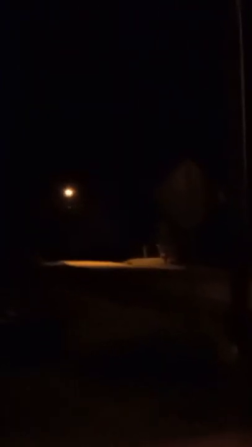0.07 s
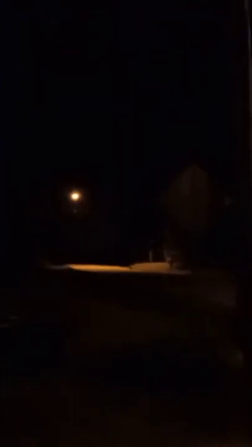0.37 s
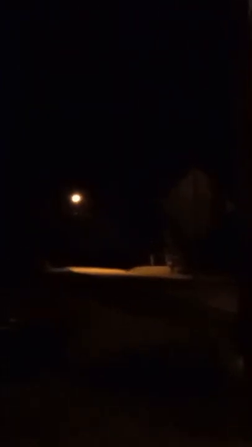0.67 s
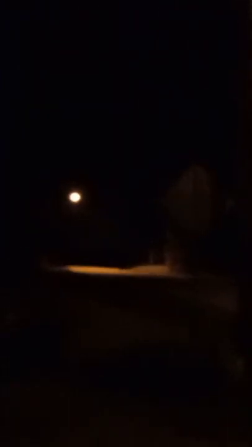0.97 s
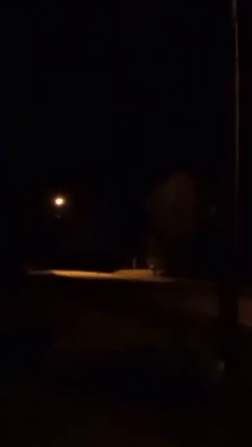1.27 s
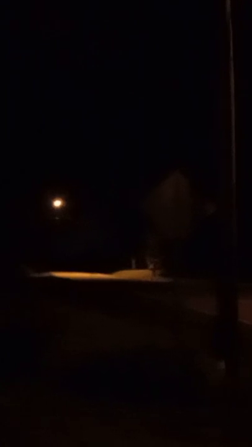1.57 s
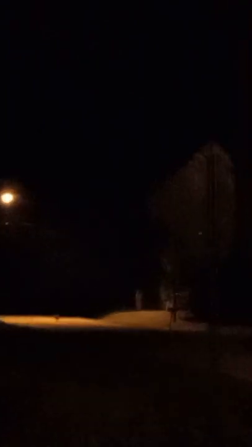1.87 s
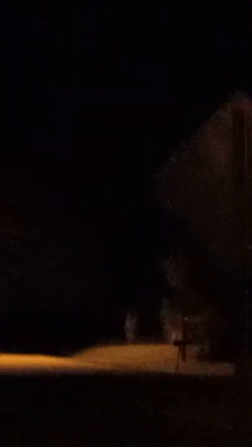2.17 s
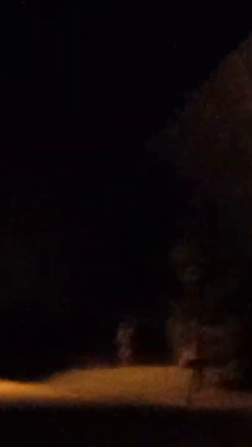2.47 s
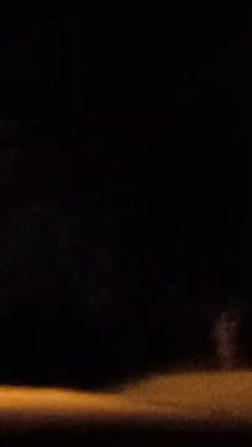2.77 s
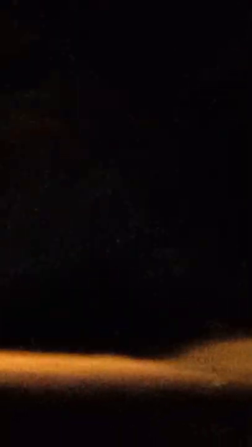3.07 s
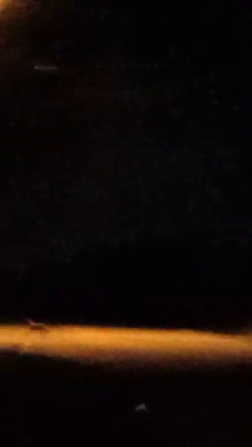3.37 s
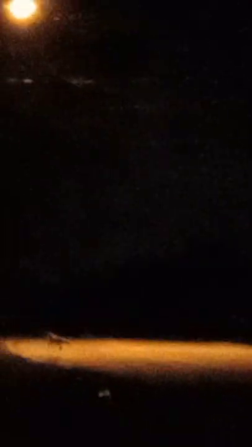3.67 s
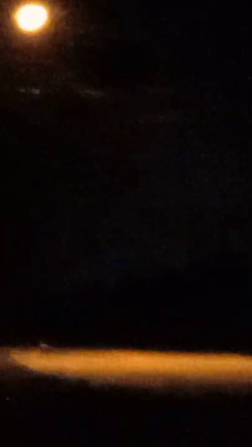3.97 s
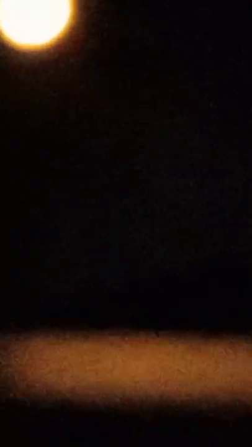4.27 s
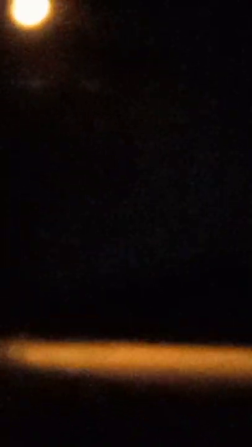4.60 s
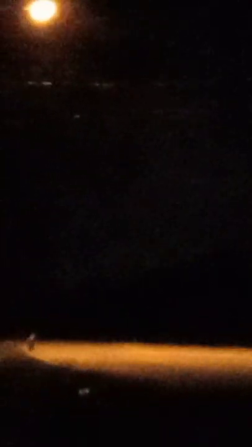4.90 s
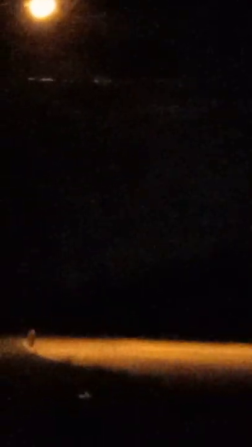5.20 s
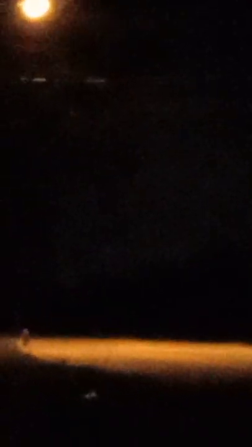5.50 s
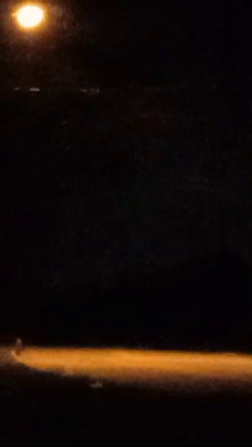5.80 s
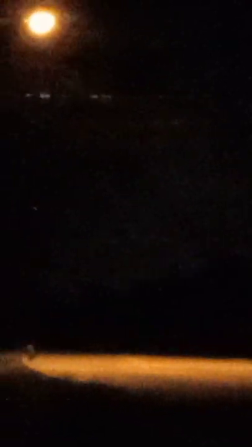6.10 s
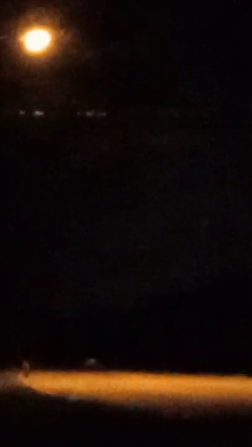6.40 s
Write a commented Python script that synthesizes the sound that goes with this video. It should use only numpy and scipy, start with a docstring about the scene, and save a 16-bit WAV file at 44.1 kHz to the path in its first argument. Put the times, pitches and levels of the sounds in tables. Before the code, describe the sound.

A sharp, hollow knock and a duller thud on the microphone come first, the loudest sounds on a still street at night. A fox then screams twice from a distance: a raspy yelp that clears into a high tone, and after a pause a quieter, purer wail with more echo. Faint crickets, pulsing katydids, barely audible far animal calls and a low town rumble continue behind.

```python
"""A quiet night street. Throughout, the town rumbles far away, crickets trill in chorus and two katydids
chirp at their own pace; faint animal calls come and go. Fingers bump and brush the hand-held camera,
mostly at its right microphone port, hardest at 1.0 and 1.5 s. At 2.1 s a fox screams: a harsh yelp
that clears into a tone and ends in a hoarse catch. At 4.1 s it gives a cleaner wail.
Houses and trees echo each scream."""
import sys
import numpy as np
from scipy import signal
from scipy.fft import rfft, irfft, next_fast_len
from scipy.io import wavfile
from scipy.ndimage import map_coordinates

SR = 44100
rng = np.random.default_rng(int(sys.argv[2]) if len(sys.argv) > 2 else 0)


def wrap_up_sound(samples):
    """Save the sound to the file named by the first command line argument, as 16-bit audio."""
    columns = np.atleast_2d(samples).T
    # keep every value between -1 and 1, then stretch to whole-number steps
    tamed = np.clip(columns, -1, 1)
    steps = np.round(tamed * 32767).astype(np.int16)
    wavfile.write(sys.argv[1], SR, steps)


N = 293265


def amp(db):
    return 10 ** (np.asarray(db) / 20)


def unit(x):
    return x / np.sqrt(np.mean(x ** 2) + 1e-20)


def clock():
    return np.arange(N) / SR


def ramp(x):
    return np.clip(x, 0, 1)


def along(points, hz):
    """Interpolate (Hz, value) points on a log axis."""
    knots_hz, values = np.transpose(points)
    return np.interp(np.log(hz + 1), np.log(knots_hz + 1), values)


def curves(rows):
    """One value per sample for each column after the time."""
    times_s, *columns = np.transpose(rows)
    return [np.interp(clock(), times_s, column) for column in columns]


def gate(start_s, end_s, fade_s):
    """Open between two times, with linear ramps."""
    return ramp(np.minimum(clock() - start_s, end_s - clock()) / fade_s + .5)


def hump(centre_s, half_s):
    """Gaussian of height 1."""
    return np.exp(-((clock() - centre_s) / half_s) ** 2)


def wobble(rate_hz):
    """Smooth random curve, rate_hz knots a second."""
    return map_coordinates(rng.standard_normal(int(N * rate_hz / SR) + 4), [clock() * rate_hz])


def cycle(hz):
    """Running phase of a moving frequency."""
    return 2 * np.pi * np.cumsum(hz) / SR


def blur(phase, width_hz):
    """Narrow noise band, rms 1, riding on a pitch."""
    return unit(wobble(width_hz) * np.sin(phase) + wobble(width_hz) * np.cos(phase))


def filtered(x, response):
    """Apply a gain given as a function of Hz."""
    size = next_fast_len(N + SR // 2)
    return irfft(rfft(x, size) * response(np.fft.rfftfreq(size, 1 / SR)), size)[..., :N]


def noise(spectrum):
    """Coloured noise, rms 1, falling away outside its spectrum."""
    low_hz, high_hz = spectrum[0][0], spectrum[-1][0]
    skirts = lambda hz: np.minimum(hz / low_hz, 1) ** 4 * (high_hz / np.maximum(hz, high_hz)) ** 8
    return unit(filtered(rng.standard_normal(N), lambda hz: amp(along(spectrum, hz)) * skirts(hz)))


def wide(spectrum, shared):
    """Stereo noise, partly shared by the two ports."""
    common = np.sqrt(shared) * noise(spectrum)
    return common + np.sqrt(1 - shared) * np.array([noise(spectrum), noise(spectrum)])


def pan(left_db):
    """Port gains with mean 1."""
    gains = amp([[left_db / 2], [-left_db / 2]])
    return gains / gains.mean()


# Decay of the far echo. Each row: frequency in Hz, T60 in seconds.
ECHO_DECAY = [(200, 6.6), (1050, 1.81), (2200, 0.88), (4500, 1.33), (10000, 1.08)]

def street(x, near_db, far_db, near_t60_s):
    """Near walls scatter quickly; far houses and trees answer late and long."""
    hz, t, spectra = signal.stft(rng.standard_normal((2, 2 * SR)), SR, nperseg=256)
    decay = amp(-60 * t / along(ECHO_DECAY, hz)[:, None])
    build_up = 1 - np.exp(-t / 0.09)
    far = signal.istft(spectra * decay * build_up, SR, nperseg=256)[1]
    t = np.arange(far.shape[1]) / SR
    near = rng.standard_normal(far.shape) * amp(-60 * t / near_t60_s) * (t > .006)
    echo = amp(near_db) * near / np.linalg.norm(near[0]) + amp(far_db) * far / np.linalg.norm(far[0])
    return x + signal.fftconvolve(np.atleast_2d(x), echo, axes=1)[:, :N]


def port_shadow(x):
    """The left port is turned away and hears less treble."""
    shade = [(700, -3.5), (1200, -3.0), (2300, -14), (4400, -16)]  # Hz, left minus right in dB
    left = lambda hz: amp(along(shade, hz))
    return filtered(x, lambda hz: 2 * np.array([left(hz), np.ones(len(hz))]) / (1 + left(hz)))


# Background drift. Each row: time in seconds, relative rumble level in dB, relative hiss level in dB.
BACKGROUND_DRIFT = [(0.0, -58, -77), (0.31, -61.5, -80.5), (0.94, -59, -77.5), (1.35, -55, -77.5),
                    (1.94, -60, -78.5), (2.39, -52, -72), (2.83, -61.5, -78), (3.87, -58.5, -78.5),
                    (4.18, -52, -75.5), (4.74, -58.5, -76), (5.15, -56, -78.5), (5.74, -58.5, -78),
                    (6.11, -57.5, -80), (6.65, -55.5, -75)]
# Town rumble. Each row: frequency in Hz, relative level in dB.
TOWN_SPECTRUM = [(13, -76), (22, -66), (41, -14.5), (76, 1), (118, -3), (145, -10.5), (259, -20),
                 (360, -19.5), (381, -25.5), (480, -26.5), (641, -31.5), (734, -29.5), (1080, -30.5),
                 (1440, -41), (2200, -62), (2860, -85), (4840, -120)]
# Soft low thumps close by. Each row: centre in seconds, bass gain in dB.
LOW_THUMPS = [(.38, 11), (.65, 5.5), (2.05, 6.5), (3.059, 9.5), (3.53, 6.5), (4.92, 7)]
# Distant machinery. Each row: frequency in Hz, relative level in dB.
MACHINE_TONES = [(312.2, -79), (355.3, -77.5), (1303, -84), (1895, -97.5)]
# Treble hiss. Each row: frequency in Hz, relative level in dB.
TREBLE_SPECTRUM = [(1500, -24), (3400, -19.5), (4200, -1.5), (4900, 7.5), (5600, 2), (6050, 7), (6600, -14),
                   (7500, 3.5), (8400, -9.5), (9300, -33), (10500, -4.5), (12000, 3), (13500, 5),
                   (15700, 0)]

def night_town():
    """Far town rumble, with a few soft low thumps close by, faint machine hum and fine hiss."""
    rumble_db, hiss_db = curves(BACKGROUND_DRIFT)
    bass_db = rumble_db + 1.5 * wobble(9) + sum(db * hump(s, half_s=0.03) for s, db in LOW_THUMPS)
    bass_share = lambda hz: 1 / (1 + (hz / 170) ** 6)
    bass = amp(bass_db + 4) * filtered(wide(TOWN_SPECTRUM, 0.89), lambda hz: np.sqrt(bass_share(hz)))
    wash = amp(-54.5) * filtered(wide(TOWN_SPECTRUM, 0.33), lambda hz: np.sqrt(1 - bass_share(hz)))
    hum = sum(amp(db + 4) * np.sin(cycle(hz * (1 + 0.00384 * wobble(15)))) for hz, db in MACHINE_TONES)
    left_lead_s = 0.0005
    arrival = lambda hz: np.exp(np.array([[1j], [-1j]]) * np.pi * hz * left_lead_s)
    lows = filtered(bass + wash + hum, arrival) * pan(-6.5)
    hiss = amp(hiss_db + 4) * wide(TREBLE_SPECTRUM, 0.057) * pan(-11.5)
    floor_spectrum = [(1200, 5.5), (3300, -5.0), (6000, 2), (9300, -6.5), (12000, -3.0), (15700, -9)]
    return lows + hiss + amp(-79.5) * wide(floor_spectrum, 0)


# Far animal calls. Each row: centre in seconds, pitch in Hz, level in dB.
ANIMAL_CALLS = [(1.19, 505, -63), (1.41, 770, -68), (1.8, 440, -65), (3.01, 770, -72), (3.5, 760, -68),
                (3.88, 490, -65), (5.22, 760, -73)]

def far_animals():
    """Short, hoarse calls from far down the street."""
    return sum(amp(db) * hump(s, half_s=.032) * blur(2 * np.pi * hz * clock(), width_hz=150)
               for s, hz, db in ANIMAL_CALLS)


# Cricket chorus. Each row: frequency in Hz, relative level in dB.
CRICKET_SPECTRUM = [(2100, -28.5), (2380, -16.5), (2540, 0), (2670, 6.5), (2800, -3), (2930, -10.5),
                    (3080, -98)]

def crickets():
    """Many trills blur into one band."""
    level_db = -66.5 + 0.32 * wobble(2.68) + 0.88 * wobble(40)
    return amp(level_db) * wide(CRICKET_SPECTRUM, 0.058) * pan(-5.5)


# Far katydid's wings. Each row: frequency in Hz, relative level in dB.
FAR_WING_SPECTRUM = [(7000, -12.5), (7500, -7), (7850, 0), (8150, 0), (8400, -13.5), (8650, -5.5),
                     (9500, -43)]

def far_katydid():
    """Chirps about four times a second, off to the left."""
    chirping = np.cos(2 * np.pi * (clock() - 5.05) / .2445 + .3 * wobble(2))
    level_db = -83 + 3.5 * chirping + 1.1 * wobble(120)
    return amp(level_db) * wide(FAR_WING_SPECTRUM, 0.022) * pan(9.3)


# Near katydid's chirps. Each entry: start in seconds.
CHIRP_STARTS_S = [.049, .42, 0.797, 1.166, 1.554, 1.91, 2.311, 2.705, 3.025, 3.374, 3.845, 4.256, 4.68,
                  5.03, 5.459, 5.796, 6.15, 6.559]
# Its wings. Each row: frequency in Hz, relative level in dB.
NEAR_WING_SPECTRUM = [(6600, -33), (6950, -6), (7150, -11.5), (7300, -5.5), (7400, 1), (7520, -6.5),
                      (7700, -20), (8300, -34)]
# Its level as the camera swings. Each row: time in seconds, relative level in dB, left gain in dB.
KATYDID_SWING = [(0, -73.5, -12), (.7, -75, -10), (3.1, -75.5, -4.5), (4.3, -72.5, -2), (6.6, -73.5, -6.5)]

def near_katydid(chirp_s=0.086, scatter_db=1.1):
    """Each chirp is a burst of wing strokes; no two are equally strong."""
    strokes = np.zeros(N)
    for start_s in CHIRP_STARTS_S:
        envelope = amp(-scatter_db * rng.standard_normal()) * gate(start_s, start_s + chirp_s, .03)
        stroke_hz = rng.normal(84, 1)
        strokes += envelope * np.sin(np.pi * stroke_hz * (clock() - start_s)) ** 2
    level_db, left_db = curves(KATYDID_SWING)
    return amp(level_db + 8) * strokes * wide(NEAR_WING_SPECTRUM, 0.21) * amp([left_db, np.zeros(N)])


# Skin rubbing the case. Each row: frequency in Hz, relative level in dB.
RUB_SPECTRUM = [(350, -1.5), (900, 0), (1400, -0.5), (2700, -2.5), (3700, -21), (6000, -16.5), (8700, -15),
                (10500, -24.5), (15500, -20)]

def finger_brush(start_s=1.0135, length_s=0.022):
    """A finger slides on the case; each port hears its own colour."""
    lean = [(1000, -4.0), (5000, 4), (8600, 13.5), (11000, 11), (15000, -1)]  # Hz, left minus right in dB
    rub = amp(-42) * gate(start_s, start_s + length_s, 0.0026) * wide(RUB_SPECTRUM, 0)
    return filtered(rub, lambda hz: amp(np.array([[.5], [-.5]]) * along(lean, hz)))


# Camera case modes. Each row: frequency in Hz, T60 in seconds, relative level in dB.
CASE_MODES = [(298, 0.019, 8), (563, 0.042, -7), (1070, 0.0061, 5.5)]
# Finger contacts. Each row: start in seconds, relative thud, ring and click levels in dB,
# click brightness in Hz, left minus right in dB.
FINGER_BUMPS = [(0.259, -70, -50.5, -41, 3280, -23), (1.043, -23, -17.5, -10.5, 1790, -35),
                (1.452, -21, -40, -40.5, 1510, -36), (1.4628, -21, -35, -51, 1480, -28),
                (2.023, -64, -37.5, -43, 1620, -32), (2.624, -55, -41.5, -35, 1920, -24),
                (4.122, -62, -43.5, -41, 1520, -15)]

def finger_bumps():
    """Each bump is a click, a hollow ring of the case and a thud."""
    t = np.arange(SR // 5) / SR
    thud = amp(-60 * t / 0.027) * np.sin(2 * np.pi * 80 * t)
    ring = sum(amp(db - 60 * t / t60_s) * np.sin(2 * np.pi * hz * t) for hz, t60_s, db in CASE_MODES)
    ring /= np.abs(ring).max()
    bumps = np.zeros((2, N))
    for start_s, thud_db, ring_db, click_db, bright_hz, left_db in FINGER_BUMPS:
        angle = 2 * np.pi * bright_hz * t
        click = angle ** 2 * (3 - angle) * np.exp(-angle)
        bump = amp(thud_db) * thud + amp(ring_db) * ring - amp(click_db) * click / np.abs(click).max()
        # a softer contact passes less treble
        muffled = signal.sosfilt(signal.butter(8, 5 * bright_hz / 3, fs=SR, output="sos"), bump)
        bumps += pan(left_db) * np.pad(muffled + amp(-16) * bump, (round(start_s * SR), N))[:N]
    microphone_low_cut = signal.butter(3, 55, "high", fs=SR, output="sos")
    return signal.sosfilt(microphone_low_cut, bumps)


def pitch_arch(t, length_s, top_hz, top_s, waver_hz):
    """A scream's pitch climbs quickly, overshoots and settles, then sags late."""
    climb_hz = 258.7 * ramp(1 - t / top_s) ** 2.1
    sag_hz = 112.4 * ramp((t - top_s) / (length_s - top_s)) ** 2.7
    settling_hz = waver_hz * np.exp(-t / .13) * np.cos(2 * np.pi * t / 0.0874)
    return top_hz - climb_hz - sag_hz - settling_hz


# Jaw resonances. Each row: frequency in Hz, overtone gain in dB.
JAW_RESPONSE = [(1700, -12), (2000, 8), (2180, 7), (2600, 16), (3000, -5), (3250, 3), (3800, -53),
                (4100, -7), (4280, 5.5), (4600, -19), (4920, 1.5), (5150, -6), (5400, -17)]

def jaw_overtones(pitch_hz, phase, airy):
    """Each overtone flares as it glides through a resonance; higher ones blur more."""
    overtones = np.zeros(N)
    for k in range(2, 6):
        gain_db = along(JAW_RESPONSE, k * pitch_hz) + 2.9 * wobble(45)
        jitter = .35 * (k - 2) * (0.5 + 2 * airy) * wobble(150)
        overtones += amp(gain_db) * np.sin(k * phase + jitter)
    return overtones


# Rasp bands. Each row: multiple of the pitch, relative level in dB.
RASP_BANDS = [(1.07, 3.5), (1.28, -4), (1.5, -3.5), (1.74, -7.5)]
# Air through the jaws. Each row: frequency in Hz, relative level in dB.
BREATH_SPECTRUM = [(350, -15), (800, 0.5), (1400, 2), (1900, 5), (2400, -0.5), (2800, 0), (3600, -4.5),
                   (4300, -7), (5500, -18), (7000, -25), (12000, -34)]
# Brief dips of the tone. Each row: centre in seconds, half-length in seconds, depth in dB.
TONE_DIPS = [(4.242, .024, 11), (4.409, 0.02, 26)]
ATTACK_S, OPEN_S, HOLD_S = 0.015, 0.068, 0.12
RASP_CLEAR_S, HISS_CLEAR_S, FRAY_S = 0.013, 0.037, 0.068
EFFORT_DB_PER_HZ = .025

def scream(start_s, length_s, top_hz, top_s, waver_hz, body_db, fade_db, edge_db,
           rasp_s, hiss_share, fray_share):
    """A near-pure cry; strain breaks it into half-pitch flutter and chaotic bands of rasp."""
    t = np.maximum(clock() - start_s, 0)
    pitch_hz = pitch_arch(t, length_s, top_hz, top_s, waver_hz)
    strain = ramp((rasp_s - t) / RASP_CLEAR_S + .5) * (rasp_s > 0)
    rasp_hiss = ramp(1 - (t - rasp_s) / HISS_CLEAR_S) * (rasp_s > 0)
    fray = fray_share * ramp(1 - (length_s - t) / FRAY_S)
    rough = ramp(0.779 * strain + fray)
    airy = ramp(hiss_share + (1 - hiss_share) * rasp_hiss + fray)
    phase = cycle(pitch_hz * (1 + 0.0048 * wobble(120) + 0.027 * rough * wobble(400)))
    flutter = 0.36 * strain * np.sin(3 * phase / 2)
    tone = np.sqrt(2) * (np.sin(phase) + flutter)
    rasp = unit(sum(amp(db) * blur(k * phase, width_hz=240) for k, db in RASP_BANDS))
    overtones = jaw_overtones(pitch_hz, phase, airy)
    breath = noise(BREATH_SPECTRUM) * amp(4 + 0.96 * wobble(180))
    body = np.sqrt(1 - rough ** 2) * tone + rough * rasp
    edge = (1 - airy ** 2) * overtones + airy * breath
    # the throat takes a moment to reach full force, then tires; the edge comes in later
    swell = 1 - np.exp(-(t / ATTACK_S) ** 2)
    opening = 1 - np.exp(-(t / OPEN_S) ** 1.5)
    tired = ramp((t - HOLD_S) / (length_s - HOLD_S)) ** 0.84
    dip_db = sum(db * hump(s, half_s) for s, half_s, db in TONE_DIPS)
    slack_db = EFFORT_DB_PER_HZ * (top_hz - pitch_hz)
    body *= amp(body_db - slack_db - fade_db * tired - dip_db)
    edge *= opening * amp(edge_db - 10 * tired)
    return swell * gate(start_s, start_s + length_s, 0.01) * (body + edge)


# Hoarse catch. Each row: frequency in Hz, relative level in dB.
CATCH_SPECTRUM = [(550, -5.5), (800, 1.5), (1250, -5), (1600, -0.5), (1900, 3), (2250, 1), (2700, 0),
                  (3300, -23), (4300, -6.5), (5000, -31)]
# Screams. Each row: start and length in seconds, top pitch in Hz, time to the top in seconds,
# waver in Hz, body level and its fade in dB, relative edge (overtones and breath) level in dB,
# raspy opening in seconds, hiss share 0-1, end fray 0-1, near scatter in dB, far echo in dB.
FOX_SCREAMS = [(2.08, .41, 1080, .172, -1, -35, 11.5, -57.5, 0.13, 0.62, 0.5, -7, -17),
               (4.075, .43, 1093, .215, 35.5, -44.5, 6.5, -65.5, 0.0011, 0.2, 0.2, -3.5, -9)]

def fox():
    """Two echoing screams; the first ends in a hoarse catch, the second cracks into a brief side tone."""
    yelp, wail = [scream(*row[:-2]) for row in FOX_SCREAMS]
    catch = hump(2.495, half_s=0.038) * amp(-53.5 + 1.2 * wobble(200)) * noise(CATCH_SPECTRUM)
    crack = hump(4.225, half_s=.022) * amp(-64.5) * blur(2 * np.pi * 1710 * clock(), width_hz=60)
    return sum(street(cry, near_db, far_db, near_t60_s=0.66)
               for cry, (*_, near_db, far_db) in zip([yelp + catch, wail + crack], FOX_SCREAMS))


def scene():
    animals = street(far_animals(), near_db=-5, far_db=-7, near_t60_s=.2)
    handling = street(finger_brush() + finger_bumps(), near_db=-28, far_db=-39.5, near_t60_s=0.33)
    voices = port_shadow(fox() + animals)
    insects = crickets() + near_katydid() + far_katydid()
    return night_town() + insects + handling + voices


def record(dry):
    """The camera keeps nothing above its band limit."""
    return filtered(dry, lambda hz: hz < 15720)


dry = scene()
out = record(dry)
wrap_up_sound(out)
```